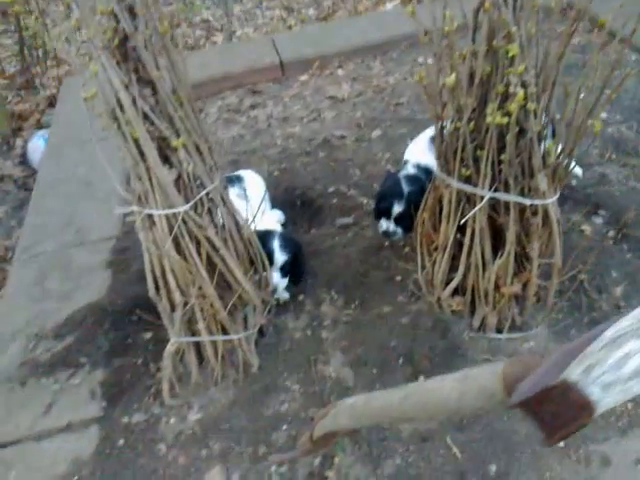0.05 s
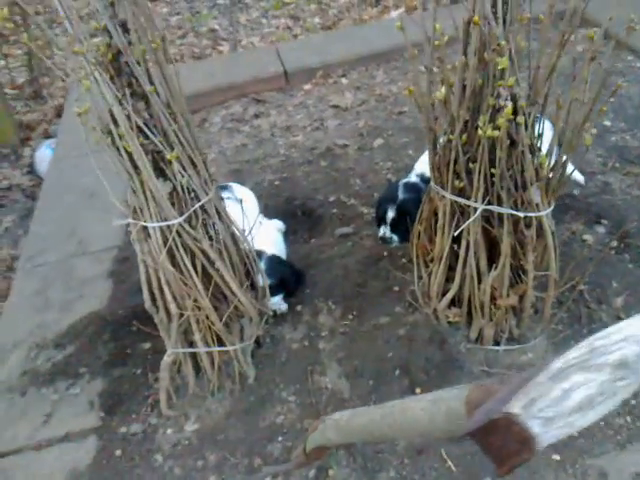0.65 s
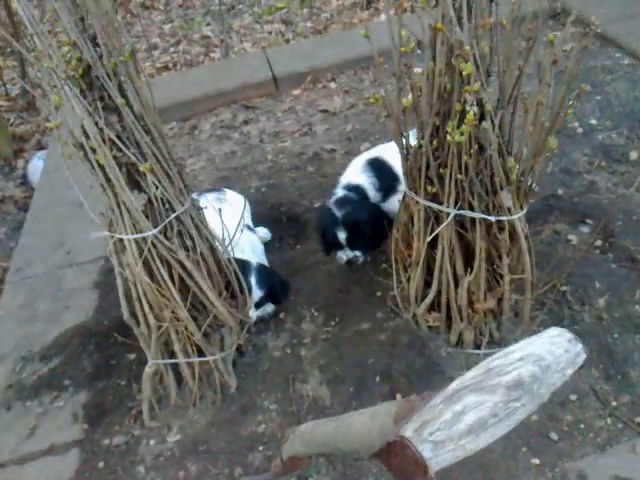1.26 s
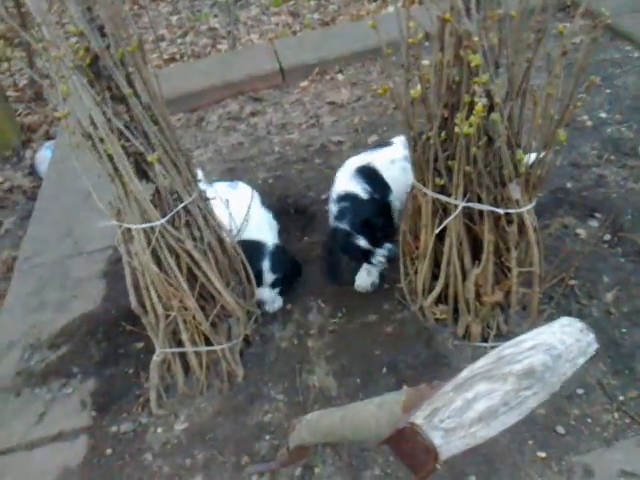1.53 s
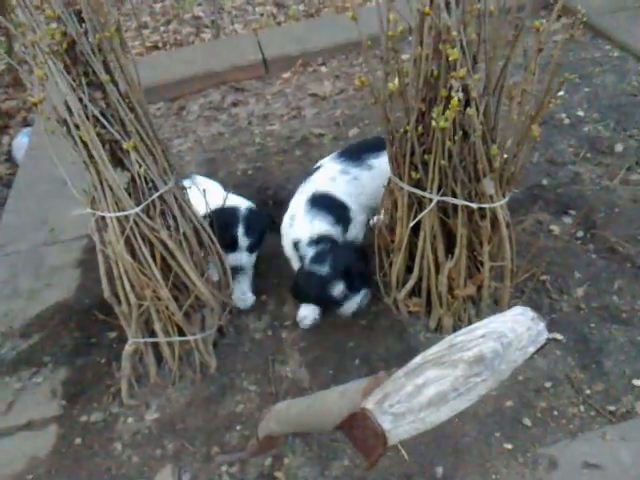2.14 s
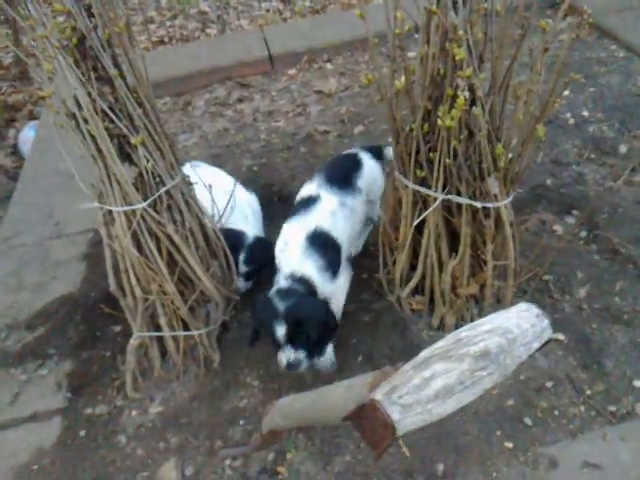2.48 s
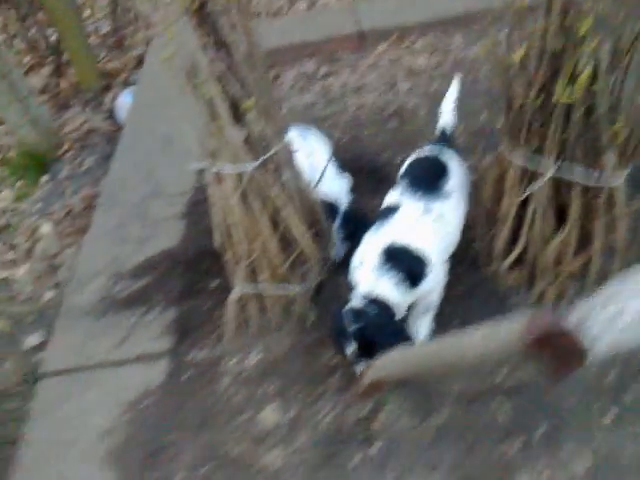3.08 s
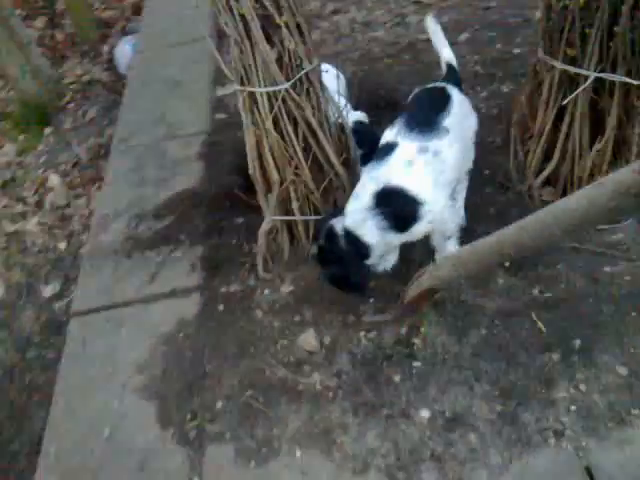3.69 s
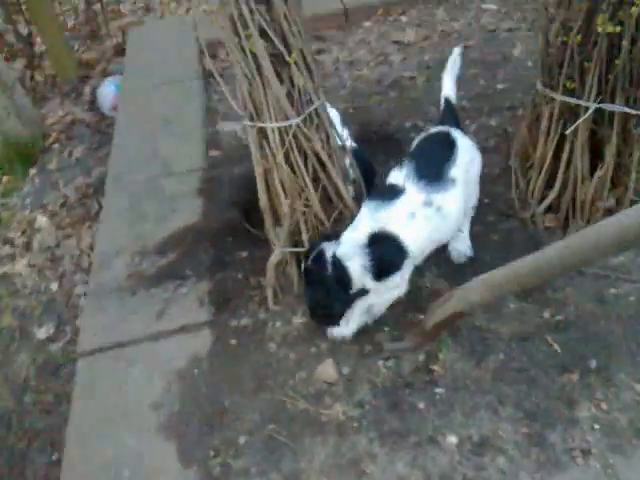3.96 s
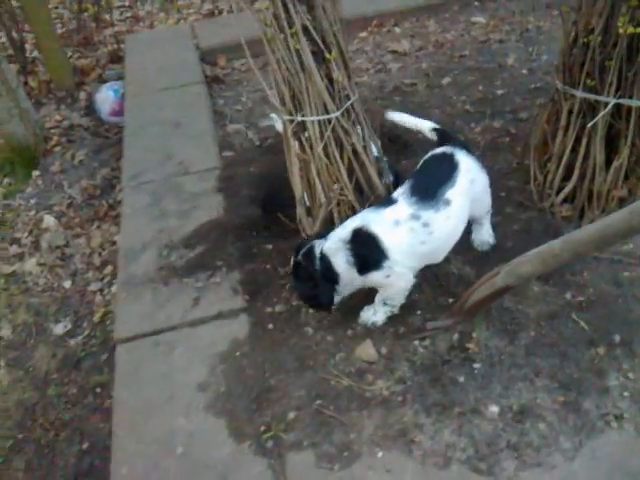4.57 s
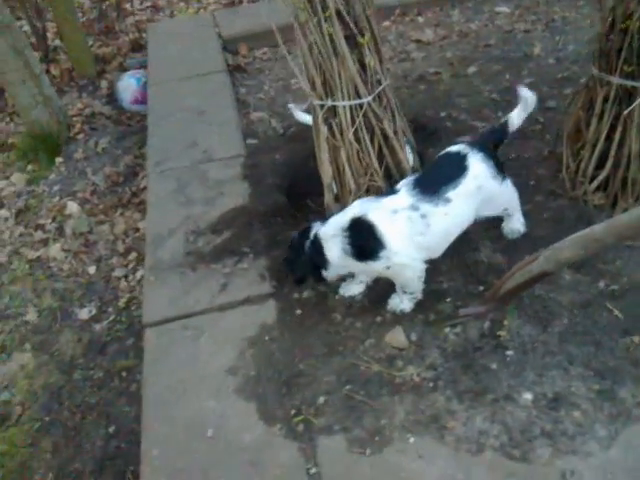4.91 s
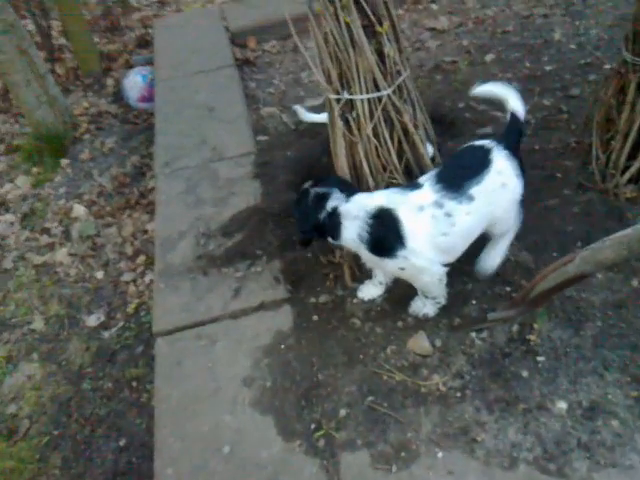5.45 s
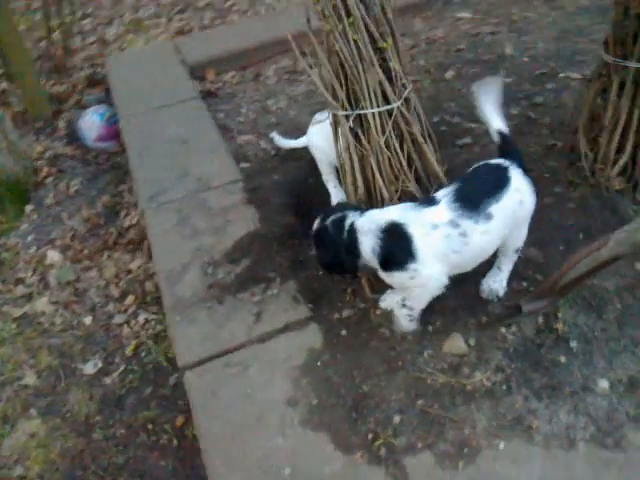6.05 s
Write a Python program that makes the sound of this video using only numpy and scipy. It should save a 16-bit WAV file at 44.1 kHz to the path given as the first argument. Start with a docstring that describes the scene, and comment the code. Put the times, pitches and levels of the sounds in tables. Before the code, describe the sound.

Birds call outdoors over a growing rush of road noise, with light twig snaps, rustles and a few soft knocks.

```python
"""A garden in early spring. Songbirds whistle and chirp from the trees, each note a gliding tone
roughened by random modulation. A broad rush of shaped noise, like tyres approaching on a road,
swells and slowly covers them. Two puppies nose about bundles of dry saplings: twigs rustle, tick
and crackle in brief noise bursts, and a few soft knocks ring as damped modes.
Trees and walls scatter a short echo, and a faint hiss lies under everything."""
import sys
import numpy as np
from scipy import signal
from scipy.fft import rfft, irfft, next_fast_len
from scipy.io import wavfile
from scipy.ndimage import uniform_filter1d, map_coordinates

SR = 44100
rng = np.random.default_rng(int(sys.argv[2]) if len(sys.argv) > 2 else 0)


def store_pcm(level_fs):
    """Save levels as 16-bit WAV."""
    pcm = np.round(np.clip(level_fs, -1, 1) * 32767).astype(np.int16)
    wavfile.write(sys.argv[1], SR, np.atleast_2d(pcm).T)


N = 279153
FALL_OCT_PER_S = 3.72  # shared by slurs, chirps and twitters


def birds():
    """Frequency modulation: each kind of call has its own pitch contour. Levels are relative."""
    # falling notes: start_s, length_s, middle_hz, level_db
    slurs = [(2.253, 0.035, 2540, -53), (2.673, 0.044, 2000, -46), (3.191, 0.054, 3100, -55),
             (3.23, 0.09, 2383, -46.5), (3.537, 0.032, 2340, -49.5), (6.108, 0.07, 4120, -64)]
    # one bird's repeated, slightly arched peep: start_s, level_db
    peeps = [(3.374, -76), (3.883, -65.5), (4.382, -67.5), (4.927, -65), (5.862, -62.5)]
    # raspy notes that climb and level off: start_s, length_s, middle_hz, level_db
    burrs = [(2.434, 0.088, 2524, -51), (2.63, 0.13, 2650, -56.5), (3.057, 0.0636, 2378, -46.5)]
    # a small bird's two-voiced chirps: start_s, level_db
    chirps = [(0.246, -65.5), (0.388, -68.5)]
    # held notes: start_s, length_s, middle_hz, level_db, slide_oct_per_s
    whistles = [(0.018, 0.15, 7690, -79, -0.068), (0.468, 0.135, 2630, -72.5, 1.25),
                (0.766, 0.15, 2200, -66, -0.3), (0.96, 0.12, 2060, -62, -1.2),
                (1.508, 0.15, 2920, -71, 0.44), (1.51, 0.11, 3560, -71.5, -1.04),
                (1.965, 0.092, 2310, -50.5, -0.022), (2.259, 0.12, 3770, -68, 0.47),
                (2.276, 0.081, 2065, -49, 0.75), (2.458, 0.12, 3690, -66, -0.4),
                (2.836, 0.085, 1640, -49.5, -1.2), (3.31, 0.18, 3010, -65, 0.045),
                (3.471, 0.057, 1995, -42.5, 0.64), (4.488, 0.11, 2690, -58.5, -0.5),
                (4.722, 0.265, 3040, -70, 0)]
    # runs of hoarse falling notes: start_s, length_s, middle_hz, level_db
    twitters = [(0.658, 0.4, 3695, -70.5), (1.292, 0.18, 2750, -66), (3.939, 0.33, 3280, -66.5)]
    peep_s, peep_contour_hz, peep_rasp = 0.0765, (4590, 4600, 4430), 0.07
    chirp_s, lower_hz, upper_hz = 0.043, 4845, 6350
    burr_rasp = 0.77
    notes = trill(count=4)
    notes += [glide_note(*slur, -FALL_OCT_PER_S, rasp=0.17) for slur in slurs]
    notes += [(s, peep_s, *peep_contour_hz, db, peep_rasp) for s, db in peeps]
    notes += [(s, length, hz * 0.86, hz, hz * 1.02, db, burr_rasp) for s, length, hz, db in burrs]
    for s, db in chirps:
        notes.append(glide_note(s, chirp_s, lower_hz, db, -FALL_OCT_PER_S, rasp=0.17))
        notes.append(glide_note(s, chirp_s, upper_hz, db - 6.5, -FALL_OCT_PER_S, rasp=0.17))
    notes += [glide_note(*whistle, rasp=0.17) for whistle in whistles]
    notes += [note for phrase in twitters for note in twitter(*phrase)]
    return calls(notes)


def trill(count):
    """Periodic repetition: quick rising notes, each lower and louder than the last."""
    start_s, gap_s, note_s = 4.364, 0.0685, 0.03
    first_hz, step_hz, step_db = 6050, -130, 1.7
    return [glide_note(start_s + k * gap_s, note_s, first_hz + k * step_hz, -67 + k * step_db,
                       oct_per_s=8, rasp=0.89) for k in range(count)]


def twitter(s, length, hz, db):
    """Jitter: the notes of a growing phrase scatter at random in time, pitch and level."""
    gap_s, note_s, growth_db = 0.093, 0.06, 1.3
    scatter_s, scatter_oct, scatter_db = 0.012, 0.07, 2.5
    beats = np.arange(s, s + length, gap_s)
    late, high, loud = rng.standard_normal((len(beats), 3)).T
    starts = beats + scatter_s * late
    pitches = hz * 2 ** (scatter_oct * high)
    levels = db + growth_db * (beats - beats.mean()) / gap_s + scatter_db * loud
    return [glide_note(start, note_s, pitch, level, -FALL_OCT_PER_S, rasp=0.8)
            for start, pitch, level in zip(starts, pitches, levels)]


def glide_note(s, length, hz, db, oct_per_s, rasp):
    """A glissando: the note's start, middle and end pitches lie equal intervals apart."""
    half = 2 ** (oct_per_s * length / 2)
    return s, length, hz / half, hz, hz * half, db, rasp


def calls(notes):
    """Tones glide through three pitches; fast random modulation (rasp, 0-1) is heard as roughness."""
    song = np.zeros(N)
    for s, length, start_hz, middle_hz, end_hz, db, rasp in notes:
        u, swell = arch(length)
        glide = np.polyval(np.polyfit([0, .5, 1], [start_hz, middle_hz, end_hz], 2), u)
        pitch = glide * (1 + 0.0041 * wobble(55.5, len(u)) + 0.068 * rasp * wobble(343.5, len(u)))
        shimmer_db = 2.0 * wobble(49.6, len(u)) + 5.2 * rasp * wobble(160, len(u))
        tone = np.sin(2 * np.pi * np.cumsum(pitch) / SR)
        add(song, s, amp(db) * unit(swell ** 0.41 * amp(shimmer_db) * tone))
    return song


def road():
    """Broadband rolling noise: tyre roar, tread noise and rumble grow as the traffic comes closer."""
    # tyre noise on the approach: time_s, roar_db, tread_db
    approach = [(0.0, -69.5, -70), (0.92, -66, -68.5), (1.2, -57.5, -61.5), (1.75, -59, -60),
                (2.05, -54, -61.5), (2.58, -52.05, -59.5), (2.8, -49, -54), (3.12, -46, -54),
                (3.7, -48.5, -53.5), (4.0, -46, -56), (4.7, -46.5, -52), (5.7, -45, -48.5),
                (6.33, -41, -48)]
    # growth of the rumble: time_s, level_db
    swell = [(0.0, -72.5), (1.4, -72), (2.6, -67), (3.8, -62), (5.7, -60.5), (6.3, -57)]
    # tyre roar spectrum: frequency_hz, gain_db
    roar_spectrum = [(710, -38.5), (1200, -10), (1320, -5), (1530, -1.5), (1970, 2.5), (2340, -6.5),
                     (2810, -19), (4250, -27.5), (5340, -34.5), (9000, -43), (11700, -47), (19800, -120)]
    # tread noise spectrum: frequency_hz, gain_db
    tread_spectrum = [(200, -27), (380, -27), (550, -15.5), (750, -10), (880, -6), (1000, 2), (1200, 2),
                      (1450, -5.5), (1800, -1), (3000, -69)]
    # rumble spectrum: frequency_hz, gain_db
    rumble_spectrum = [(15, -7.5), (30, -5), (45, -3), (75, 2.5), (110, -1), (170, -4), (220, -11.5),
                       (320, -23), (600, -26.5), (1500, -80)]
    roar_db, tread_db = curves(approach)
    flutter = wobble(14)
    roar = amp(roar_db + 0.22 * flutter) * rush(roar_spectrum, patchy_db=1.65)
    tread = amp(tread_db + .5 * flutter) * rush(tread_spectrum, patchy_db=1.28)
    rumble = amp(curves(swell)[0]) * rush(rumble_spectrum, patchy_db=1.5)
    return roar + tread + rumble


def snaps():
    """Impulsive excitation: a twig cracks or slips in a bright burst that dies in milliseconds."""
    # dry twigs snapping: start_s, peak_db
    fractures = [(2.9, -51), (3.74, -48), (3.8974, -45), (3.9673, -43.5), (4.17, -47.5), (4.734, -45),
                 (4.746, -49), (4.784, -37), (4.866, -48)]
    # twig resonances: frequency_hz, gain_db
    twig_spectrum = [(1500, -7.5), (2800, -21), (3500, 1.5), (4300, -1.5), (5100, -5.5), (6200, 3),
                     (7000, -9), (7800, 0), (9500, -19), (11300, -33), (13000, -10), (15500, -30)]
    attack_s, t60_s = 0.00011, 0.0058
    track, t = np.zeros(N), np.arange(SR // 25) / SR
    envelope = amp(-60 * t / t60_s) * (1 - np.exp(-t / attack_s))
    for s, db in fractures + slips(count=8):
        crack = coloured(rng.standard_normal(len(t)) * envelope, twig_spectrum)
        add(track, s, amp(db) * crack / np.abs(crack).max())
    return track


def slips(count):
    """Stick-slip friction: a twig drags over bark in slips that slow down, loudest halfway."""
    start_s, first_gap_s, gap_ratio = 5.9275, 0.0078, 1.08
    gaps = first_gap_s * gap_ratio ** np.arange(count)
    peaks_db = -37.5 + 12 * np.sin(np.linspace(0, np.pi, count))
    return list(zip(start_s + np.cumsum(gaps) - gaps, peaks_db))


def rustles():
    """Granular noise: each brush sets off a crowd of tiny dry ticks, swelling and fading more slowly."""
    # paws and coats brushing the twigs: start_s, length_s, level_db
    brushes = [(1.907, 0.44, -71.5), (2.38, 0.13, -60.5), (3.55, 0.33, -71.5), (3.758, 0.46, -66),
               (4.552, 0.52, -64), (4.724, 0.12, -55.5), (4.854, 0.048, -63), (5.14, 0.23, -69.5),
               (5.575, 0.09, -67), (5.923, 0.1, -51)]
    # spectrum of the dry ticks: frequency_hz, gain_db
    tick_spectrum = [(1500, -44), (3000, -0.5), (4200, 1.5), (6000, -3), (7500, -3.5), (9500, -7),
                     (13000, -13), (15500, -18)]
    strokes = np.zeros(N)
    for s, length, db in brushes:
        u = arch(length)[0]
        add(strokes, s, amp(db) * np.abs(np.sin(np.pi * u ** 0.71)) ** 0.94)
    grains = rng.standard_normal(N) * amp(2.8 * wobble(700) + 3.0 * wobble(70))
    return strokes * coloured(grains, tick_spectrum)


def knocks():
    """Damped free vibration: each bump rings one mode that decays exponentially."""
    # soft knocks: start_s, level_db, pitch_hz, t60_s
    bumps = [(0.293, -52.5, 240, .04), (0.467, -42, 239, 0.042), (0.49, -56, 351, 0.11),
             (0.509, -51.5, 560, 0.029), (0.67, -40.5, 60, .04), (0.673, -52.5, 2140, 0.044),
             (1.2515, -32.5, 1340, 0.016), (1.536, -42.5, 64, 0.065), (3.277, -52, 490, 0.022),
             (5.825, -45, 353, 0.023)]
    attack_cycles = 0.46
    track, t = np.zeros(N), np.arange(SR // 3) / SR
    for s, db, hz, t60 in bumps:
        envelope = amp(db - 60 * t / t60) * (1 - np.exp(-t * hz / attack_cycles))
        add(track, s, envelope * np.sin(2 * np.pi * hz * t))
    return track


def hums():
    """Slow downward glides: short low tones sag a little in pitch."""
    # faint hums, perhaps a puppy grunting: start_s, length_s, pitch_hz, level_db
    tones = [(2.54, 0.086, 232.4, -74), (3.24, 0.23, 168, -63.5), (4.59, 0.1, 138.5, -65),
             (4.67, 0.13, 171, -65)]
    return calls([glide_note(*tone, oct_per_s=-0.25, rasp=0.25) for tone in tones])


def far_chorus(count):
    """Superposition: many distant birds twitter at random moments and pitches."""
    notes, rasp = [], 0.35
    for when, span, height, slide, faint in rng.random((count, 5)):
        length_s, hz = 0.028 + 0.053 * span, 2200 * 2 ** height
        bend = 1 + 0.309 * (slide - .5)
        notes.append((when * N / SR, length_s, hz * bend, hz, hz / bend, -79 - 6 * faint, rasp))
    return calls(notes)


def garden_echo(x):
    """Reverberation: trees and walls scatter a short tail in which the treble dies first."""
    # decay of the scattered sound: frequency_hz, t60_s
    decay = [(200, 0.9), (2500, 0.51), (6000, 0.31), (14000, 0.18)]
    hz, t, noise = signal.stft(rng.standard_normal(SR // 2), SR, nperseg=256)
    tail = signal.istft(noise * amp(-60 * t / along(decay, hz)[:, None]), SR, nperseg=256)[1]
    response = np.pad(tail / np.linalg.norm(tail), (SR // 100, 0))  # arrives 10 ms late
    return signal.fftconvolve(x, response)[:N]


def noise_floor():
    """Still air and faint hiss, with a thin whine blurred by random frequency modulation."""
    # spectrum of still air: frequency_hz, gain_db
    air_spectrum = [(40, 7.5), (150, -3.5), (300, -1.5), (500, -5.5), (800, 0), (1500, -14.5), (3000, -25)]
    # spectrum of the hiss: frequency_hz, gain_db
    hiss_spectrum = [(1530, -12.5), (2600, -14), (3090, -7.5), (3720, -12.5), (4290, -11.5), (6330, -14),
                     (7410, -15), (10300, -17), (15600, -20.5)]
    whine_hz = 10340 + 70 * wobble(400)
    whine = np.sin(2 * np.pi * np.cumsum(whine_hz) / SR)
    air = rush(air_spectrum, patchy_db=3.0)
    hiss = rush(hiss_spectrum, patchy_db=1.6)
    return amp(-72.5) * (air + hiss) + amp(-84) * whine


def rush(spectrum, patchy_db):
    """Noise of rms 1, modulated by random patches of gain in time and frequency."""
    noise = signal.stft(rng.standard_normal(N), nperseg=512)[2]
    patches = uniform_filter1d(rng.standard_normal(noise.shape), size=4, axis=0)
    patches = uniform_filter1d(patches, size=12, axis=1)
    uneven = signal.istft(noise * amp(patchy_db * unit(patches)), nperseg=512)[1][:N]
    return coloured(uneven, spectrum)


def coloured(x, spectrum):
    """Spectral shaping, scaled to rms 1."""
    return unit(filtered(x, lambda hz: amp(along(spectrum, hz))))


def filtered(x, response):
    """Linear filtering: the spectrum of x times a frequency response."""
    size = next_fast_len(len(x) + 8192)
    return irfft(rfft(x, size) * response(np.fft.rfftfreq(size, 1 / SR)), size)[:len(x)]


def amp(db):
    """Decibels to amplitude gain."""
    return 10 ** (np.asarray(db) / 20)


def unit(x):
    """Normalisation to rms 1."""
    return x / np.sqrt(np.mean(x ** 2) + 1e-20)


def along(points, hz):
    """Interpolation of (frequency_hz, value) points on a log frequency axis."""
    frequencies, values = np.transpose(points)
    return np.interp(np.log(hz + 1), np.log(frequencies + 1), values)


def curves(rows):
    """Linear interpolation in time: one value per sample for each column after the first."""
    times, *columns = np.transpose(rows)
    return [np.interp(np.arange(N) / SR, times, column) for column in columns]


def wobble(rate, size=N):
    """Low-pass noise: a smooth curve through rate random knots a second."""
    knots = rng.standard_normal(int(size * rate / SR) + 4)
    return map_coordinates(knots, [np.arange(size) * rate / SR])


def arch(length):
    """Progress 0-1 through a gesture, and its half-sine envelope."""
    u = np.linspace(0, 1, max(64, int(length * SR)))
    return u, np.abs(np.sin(np.pi * u))


def add(track, s, sound):
    """Superposition of a sound on the track from time s."""
    start = max(0, round(s * SR))
    part = track[start:start + len(sound)]
    part += sound[:len(part)]


def scene():
    """Direct-to-reverberant ratio: far birds carry more echo than the twigs close by."""
    song = birds() + far_chorus(count=70)
    near = snaps() + rustles() + knocks() + hums()
    echo = garden_echo(amp(-9.5) * song + amp(-20) * near)
    return (amp(-3.5) * song + near + echo + road() + noise_floor())[None]


def record(dry):
    """Band limiting: the microphone passes nothing above its top frequency."""
    top_hz = 15700
    return np.array([filtered(channel, lambda hz: hz < top_hz) for channel in dry])


dry = scene()
out = record(dry)
store_pcm(out)
```